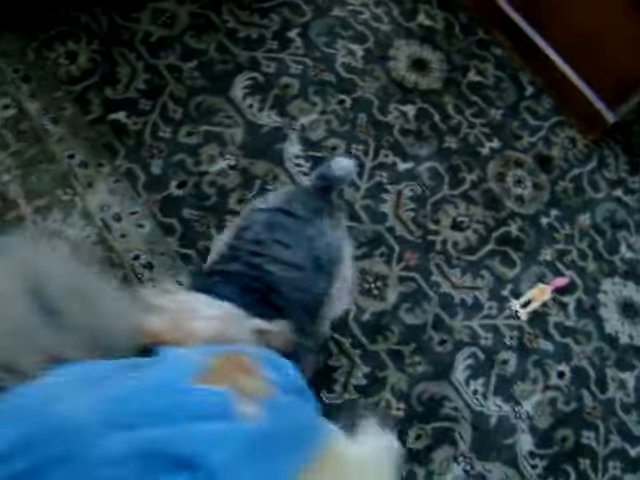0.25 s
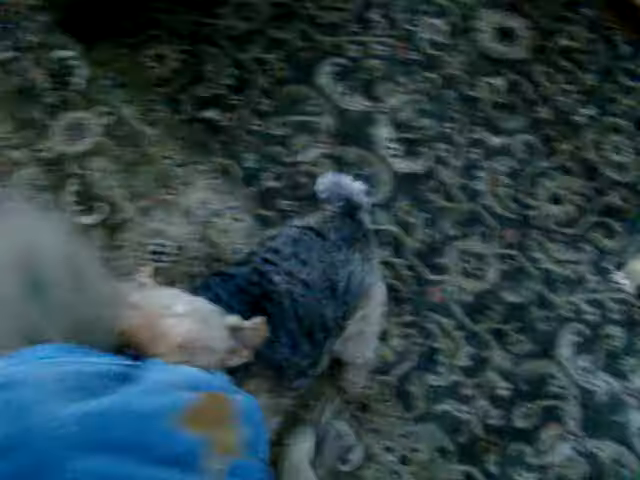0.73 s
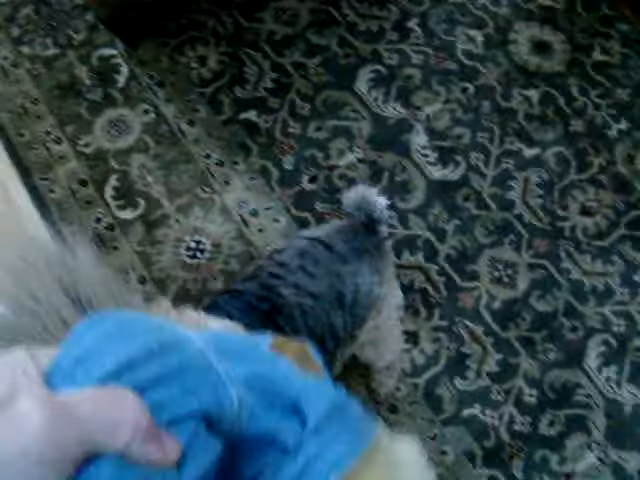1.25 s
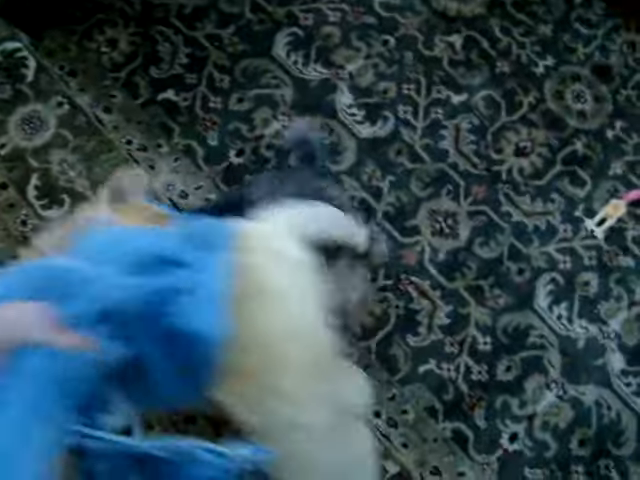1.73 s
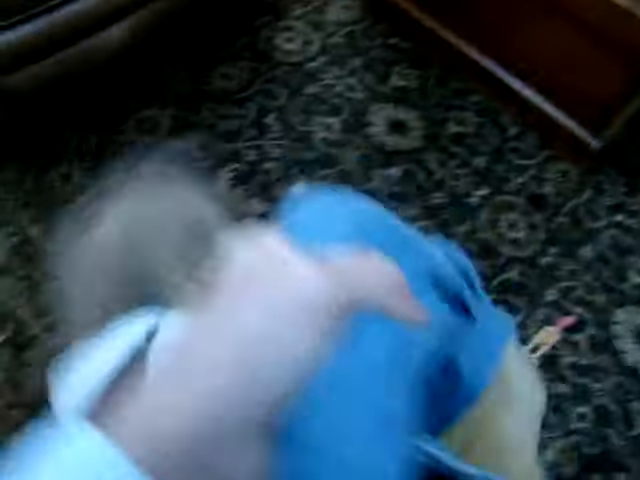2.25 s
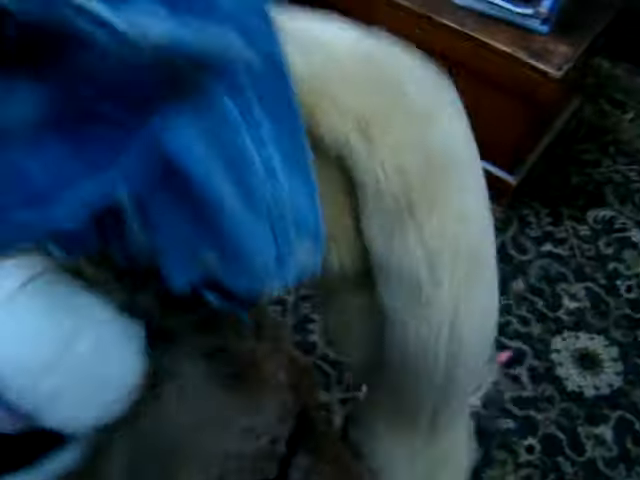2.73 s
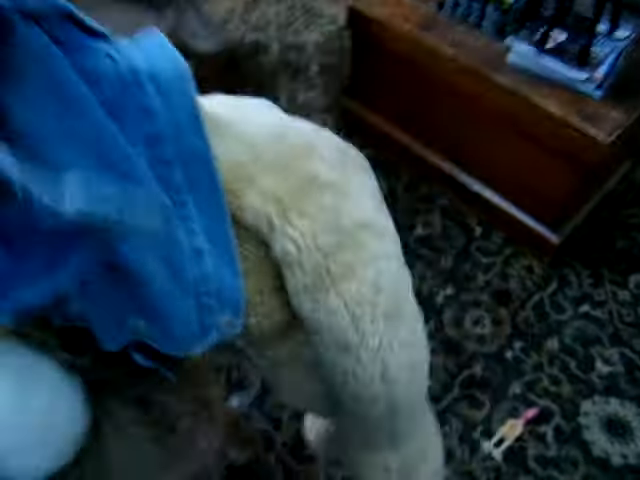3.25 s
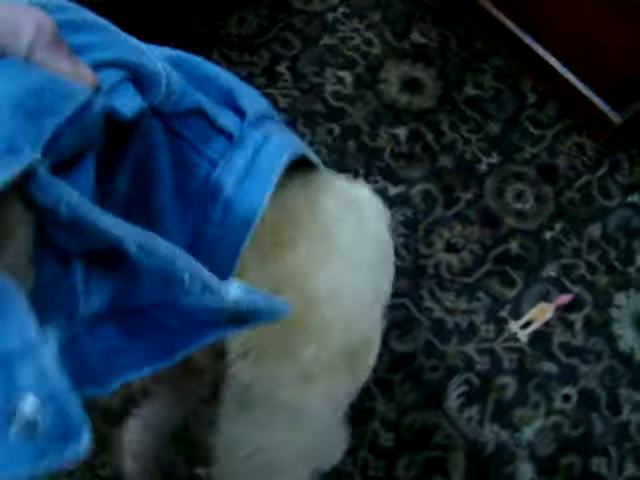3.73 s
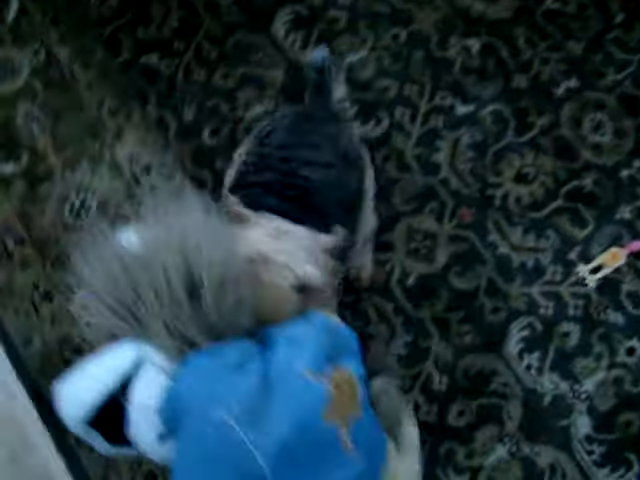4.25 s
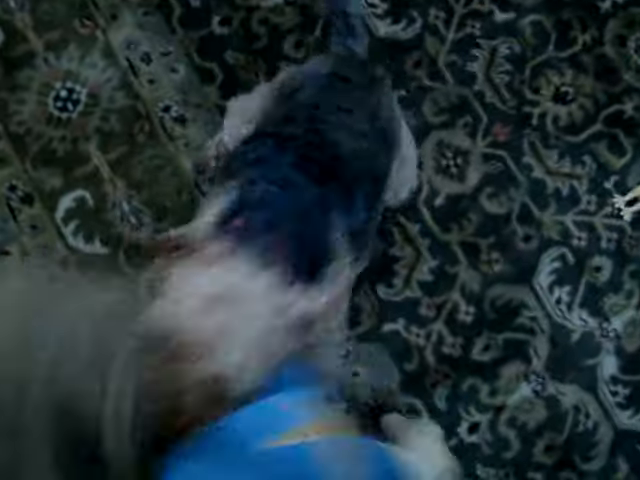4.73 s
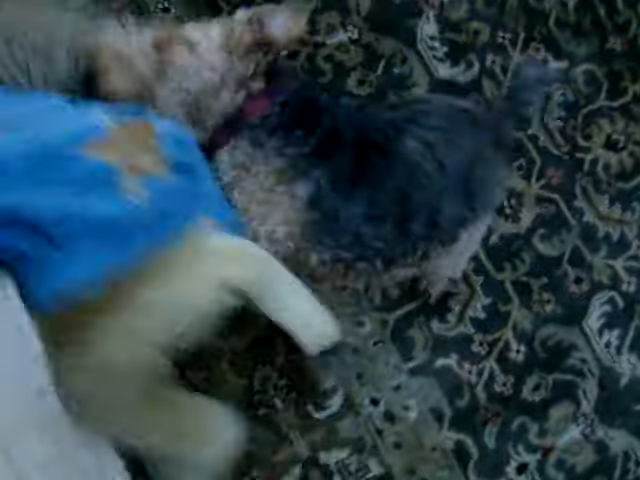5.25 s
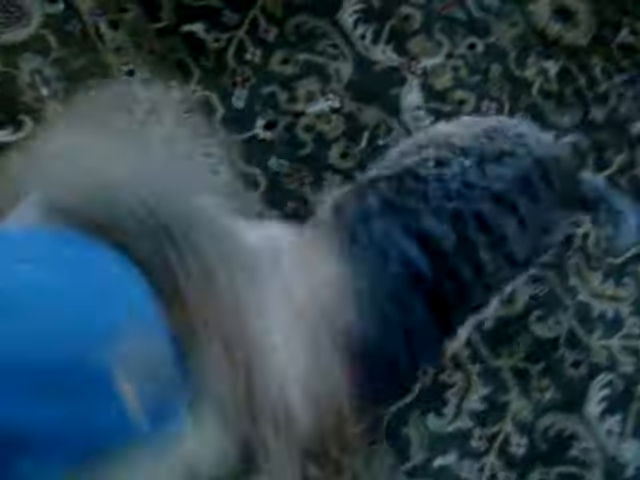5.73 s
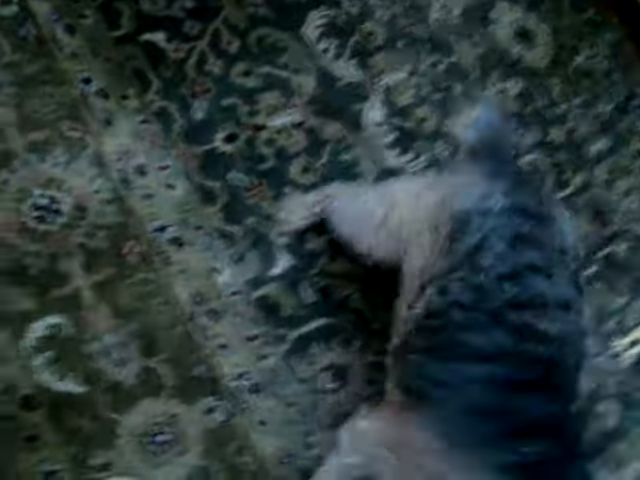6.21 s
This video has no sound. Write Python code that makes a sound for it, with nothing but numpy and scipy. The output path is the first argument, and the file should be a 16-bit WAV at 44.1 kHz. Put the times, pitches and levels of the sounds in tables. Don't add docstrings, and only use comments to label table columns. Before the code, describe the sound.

Close to a small, thin-sounding microphone in a carpeted room, a small dog growls while wrestling a plush toy. A throaty rattle opens, then a long steady growl jumps into a short yelp. A thump and hard rattling snaps follow, then a growl through cloth, a clearer whine, and a rough high snarl ending hoarse. Fabric rustles, scratches and ticks throughout.

```python
import sys
import numpy as np
from scipy import signal
from scipy.io import wavfile
from scipy.ndimage import uniform_filter1d

SR = 44100
rng = np.random.default_rng(int(sys.argv[2]) if len(sys.argv) > 2 else 0)


def digitize_waveform(pressure):
    field = np.atleast_2d(pressure).T
    bounded = np.clip(field, -1, 1)
    quanta = np.round(bounded * 32767).astype(np.int16)
    wavfile.write(sys.argv[1], SR, quanta)


def nominal_scale(level):
    x = np.asarray(level, float) / 20
    return 10 ** x


N = 285768

# time in seconds, effort in dB.
RATTLES = [
    [(0.0, -38), (0.062, -50), (0.096, -42), (0.188, -44), (0.236, -39.5), (0.372, -48.5), (0.502, -76),
     (0.575, -95)],
    [(2.13, -43), (2.18, -31), (2.248, -47), (2.31, -28), (2.372, -38.5), (2.426, -30.5), (2.664, -62.5),
     (2.715, -73)],
    [(3.13, -66), (3.168, -49.5), (3.216, -44), (3.292, -81.5), (3.46, -83)],
    [(3.44, -51.5), (3.49, -48.5), (3.556, -50), (3.6, -54)],
    [(3.56, -61), (3.624, -40.5), (3.722, -69), (3.85, -85)],
    [(4.66, -58), (4.688, -40.5), (4.742, -44), (4.78, -50)],
    [(4.78, -44), (4.82, -34.5), (4.838, -26.5), (4.888, -48.5), (4.95, -40.5), (4.99, -48.5), (5.1, -49),
     (5.222, -49)],
    [(6.09, -36), (6.16, -51), (6.182, -32), (6.26, -38), (6.278, -26.5), (6.48, -54)],
]
# mouth resonance in Hz, chest in dB re mouth, rasp in dB re mouth,
# breath share 0-1.
THROATS = [(910, -6.5, -4.5, 0.83), (782, -4.5, -9, 0.64), (1060, 2.5, 8.5, 1), (770, 2, -10, 0.4),
           (1060, -4, -16.5, 0.95), (1002, -6.5, -5, 0.8), (770, -1, -7.5, 0.54), (800, -4, -11, 0.69)]
# centre in Hz, width in Hz.
CHEST = (290, 120)
# centre in Hz, width in Hz, level in dB.
RASP = [(1065, 413, 16), (1750, 270, 11.5), (2020, 285, 12.5), (2645, 790, 5.5), (3070, 780, 1.5),
        (4260, 1930, -12)]
# start in seconds, peak
# in dB, chest in dB re mouth, ring in Hz.
FLAPS = [(0.101, -28, 1.5, 756), (0.141, -38, 10.5, 786), (0.175, -36.5, 10, 1070),
         (0.209, -35.5, 11, 1070), (0.244, -23, 2.5, 720), (0.279, -41.5, 17.5, 890), (0.316, -27, -8, 910),
         (0.352, -28.5, -8, 790), (1.9985, -20, -21, 614), (2.182, -14, -32, 920), (2.292, -11.5, -27, 780),
         (2.311, -8.5, -41, 843), (2.393, -14.5, -9, 790), (2.412, -24, -15, 740), (2.429, -6.5, -31, 800),
         (2.45, -18, -41, 800), (3.457, -49, 8, 770), (3.491, -26.5, -5, 745), (3.527, -35, 2, 750),
         (4.831, -12.5, -15, 810), (5.001, -23, -8.5, 880), (5.225, -21, -27, 980), (5.457, -23, 0, 951),
         (5.609, -10, -28, 880), (5.875, -17, -21, 800), (6.176, -11.5, -19, 770), (6.214, -12, -21, 910),
         (6.268, -14.5, -5, 740), (6.281, -15, -13, 707)]
# frequency in Hz, density in dB per Hz.
CLOTH = [(2060, -18.5), (3500, 7), (4690, 5), (5960, 6.5), (6590, 10), (8710, 10.5), (9620, 12),
         (10100, 1.5), (10400, -93.5), (13500, -48), (22000, -120)]
# time in seconds, level in dB.
TUGGING = [(0.0, -51), (0.38, -64), (0.819, -55), (1.5, -61.5), (1.804, -55), (2.003, -62), (2.419, -57.5),
           (2.735, -61), (2.745, -44.5), (3.014, -42), (3.261, -59), (3.831, -61.5), (4.1, -51.5),
           (4.631, -51.5), (4.7, -51.5), (5.126, -56.5), (5.612, -45.5), (6.48, -54)]
# peak time in seconds, rise in seconds, fall in seconds,
# level in dB.
SCUFFS = [(1.68, 0.15, 0.07, -53), (1.959, 0.0034, 0.084, -45.5), (2.17, 0.084, 0.0089, -53.5),
          (3.205, 0.062, 0.0099, -30), (4.69, 0.0028, 0.007, -55), (4.86, 0.04, 0.047, -69),
          (5.228, 0.0032, 0.2, -50), (5.41, 0.01, 0.037, -41.5), (5.69, 0.012, 0.0095, -33.5),
          (5.779, 0.017, 0.0062, -45), (6.27, 0.013, 0.044, -51)]
# start in seconds, peak in dB, pitch in Hz.
TICKS = [(0.169, -37, 8650), (1.9558, -35, 8330), (2.024, -38, 8600), (2.106, -43, 8800),
         (2.383, -43, 8040), (2.4988, -41.5, 7900), (2.5228, -68, 7300), (2.541, -42, 8600),
         (2.576, -41.5, 8750), (2.6598, -34.5, 8440), (2.683, -42, 8400), (2.762, -34, 6700),
         (2.833, -27, 8000), (2.888, -36, 8500), (3.1118, -34, 8860), (3.15, -28, 9500),
         (3.263, -31.5, 8460), (3.321, -39, 8750), (3.4086, -50, 8650), (3.4543, -44.5, 8250),
         (3.7132, -41, 8140), (3.7846, -39, 8600), (4.027, -40.5, 8100), (4.686, -34, 8460),
         (5.649, -39, 8470), (5.665, -28, 7434), (5.7027, -35, 7347), (5.7244, -33, 8930),
         (6.003, -42, 8200)]
# time in seconds, fold pitch in Hz, effort in dB, jaws open in dB,
# period doubling in dB.
LONG = [(0.578, 279, -37, -5, 2), (0.605, 291.7, -34.5, 1.5, -18), (0.69, 314.5, -33, 5, -12.5),
        (0.85, 323.6, -36.5, 5.5, -8), (1.088, 298, -35, 4.5, -13.5), (1.31, 282.3, -38, 4.5, -17.5),
        (1.43, 296.5, -38, 4.5, -15.5), (1.6, 306.7, -31, -0.5, -15)]
YELP = [(1.585, 316.7, -20.5, 9, -12), (1.62, 349.7, -30, -0.5, -11), (1.65, 404, -31, 5, -21),
        (1.675, 425.6, -31.5, 9, -28), (1.7, 366.5, -28, 0, -30), (1.73, 298.6, -35, -11, -13),
        (1.76, 289, -30, 17, -20)]
GRUMBLE = [(1.745, 304, -41, 9, -22), (1.8, 287, -36, -6, -21), (1.835, 321.6, -32, 0, -20),
           (1.875, 325, -33, 5.5, -12.5), (1.92, 273.7, -33.5, 0, -23), (1.96, 253, -38, -2, -31),
           (1.995, 311.7, -17, -9.5, -48), (2.04, 291.3, -38.5, 7.5, -18), (2.13, 266.3, -48, 1, -28)]
BITE = [(2.715, 291, -29, 19, 4), (2.729, 289.1, -33, 6, -13), (2.781, 349.5, -36.5, 12, 1.5),
        (2.899, 322.2, -31.5, 2.5, -5.5), (3.007, 349.6, -30.5, -4, -7), (3.08, 314, -35.5, -3, -1.5),
        (3.12, 307, -33.5, -6, -16), (3.15, 308.6, -47, -8, -10)]
WHINE = [(3.852, 295, -47, -9, -2), (3.875, 310.9, -35, 0.5, -21.5), (3.981, 311, -30, -1.5, -20),
         (4.085, 318.5, -26.5, -7, -24.5), (4.16, 364, -24, -3.5, -52), (4.25, 409, -29.5, -3.5, -46),
         (4.36, 346, -28, -3.5, -53), (4.535, 276.5, -35.5, -2, -41), (4.63, 263, -42.5, 0, -32)]
WINDUP = [(5.216, 325, -41, 10, 14), (5.25, 309, -35.5, 10.5, -25), (5.304, 308.7, -40.5, -13, -27),
          (5.395, 384.3, -34, 2, -37), (5.42, 336, -34.5, 7, -41), (5.455, 291, -17, -2, -27)]
SNARL = [(5.445, 437.7, -12, 9.5, -15), (5.465, 452.6, -25.5, 1, -33), (5.52, 475.5, -32.5, 1.19, -13.5),
         (5.565, 460.8, -30.5, 2.4, -29), (5.61, 447, -27.5, 2.1, -32), (5.68, 414.4, -39, 4, -20),
         (5.735, 423, -31, 2.6, -30), (5.76, 405.6, -32.5, 2.9, -39), (5.8, 334, -41, 2.9, -26)]
HOARSE = [(5.79, 372, -27, 9.3, -19), (5.834, 311.8, -30.5, 1.4, -32), (5.852, 331.7, -37, 16, -8),
          (5.956, 336.3, -37, 7, -30), (6.072, 313.6, -44.5, 8.8, -14), (6.1, 356, -37, 5, -5)]
# curve, mouth resonance in Hz, octave line in dB, rasp in dB re mouth,
# rasp drift in dB per second.
BOUTS = [
    (LONG, 884, 1.5, -7, -7),
    (YELP, 1030, -1.4, -5, 8.7),
    (GRUMBLE, 870, 1.2, -14.5, 26),
    (BITE, 860, 0.66, 1, -55),
    (WHINE, 914, 2.7, -24.5, 1.7),
    (WINDUP, 923, 1.1, -15, 64),
    (SNARL, 765, 0.71, -1.1, 4.8),
    (HOARSE, 780, -1.4, -9.5, 0),
]
VOICING = [(.33, .32), (.44, .25), (.36, .28), (.33, .2), (.34, .38), (.4, .35), (.43, .42), (.8, .4)]
# time of one throb in seconds, throbs per second, drift per second squared.
THROBS = [(.6065, 27.75, -4.5), (1.591, 27, 12), (1.752, 26, 12), (2.738, 29.5, -12), (3.878, 26, 0),
          (5.227, 20, 3), (5.465, 28.25, 4.5), (5.785, 24.5, -12)]
# mouth width in Hz, pulse share in the rasp, overtone lines in dB re effort.
JAWS = [(200, 0.34, -35), (230, .36, -6), (240, 0.36, -9), (430, 0.59, -27), (200, .3, -42),
        (230, .36, -21), (230, 1, -16.5), (242, 0.81, -7)]
# muffled above Hz, fifth half line in dB re half line,
# third line in dB re effort.
GAGS = [(1220, 9.5, -8.5), (1250, -9, -12), (1200, -12, -21), (1290, -15.5, -16.5), (1120, -10, -21),
        (1180, -5, -28), (1300, -8, -11.5), (1190, -10, -24)]
# multiple of the pitch, level in dB.
OVERTONES = [(4, -10), (5, -13)]
# start in seconds, peak in dB, ring in Hz, rasp in dB re
SNAPS = [(0.596, -24, 940, -47), (0.776, -13, 955, -29), (0.812, -11, 844, -34), (0.893, -17, 800, -27),
         (1.201, -19, 870, -28.5), (4.17, -32, 710, -27), (4.808, -31, 840, -9.5),
         (4.892, -25.5, 830, -16.5), (4.936, -36, 859, -6), (5.04, -31, 940, -29), (5.101, -26.5, 690, -40),
         (5.122, -27.5, 874, -39), (5.236, -18.5, 1063, -19.5), (5.466, -4, 925, -37),
         (5.496, -29, 965, -29), (5.511, -10, 1050, -40), (5.561, -9, 930, -28), (5.597, -18, 840, -27),
         (5.629, -6, 909, -38), (5.728, -10, 844, -27), (5.751, -35, 770, -5), (5.794, -12.5, 856, -31.5),
         (5.814, -28, 836, -35), (5.853, -15, 770, -36), (5.894, -8.5, 880, -33), (6.031, -23, 770, -25),
         (6.064, -24, 800, -24), (6.139, -23, 1110, -18), (6.234, -30, 851, -33), (6.291, -12.5, 781, -31),
         (6.301, -22, 776, -29), (6.313, -15, 770, -31), (6.423, -29, 680, -18), (6.447, -22, 710, -24)]
# start in seconds, peak in dB, centre in Hz, decay in seconds.
SCRATCHES = [(1.8785, -41, 4900, 0.0038), (1.9245, -36, 4500, 0.0026), (1.954, -35, 3400, 0.0071),
             (1.9972, -31.5, 2580, 0.0081), (2.0463, -33, 2900, 0.0074), (2.0838, -37, 2830, 0.018),
             (2.139, -32.5, 3977, 0.0029), (2.1625, -34, 4850, 0.0031), (2.589, -49, 3200, .003),
             (4.681, -33.5, 3730, 0.0062), (5.0223, -43, 2660, 0.0035), (5.1783, -46, 3530, 0.0036),
             (5.2245, -29.5, 3370, 0.004), (5.4052, -34, 3520, 0.03), (5.768, -24, 3260, 0.0061),
             (5.9085, -36, 3970, 0.0061), (6.017, -34, 3600, 0.0018), (6.0444, -31.5, 4850, 0.0036),
             (6.176, -36.5, 3400, 0.003), (6.2398, -39.5, 3000, 0.0056), (6.268, -35, 4000, 0.0032),
             (6.4348, -44, 4430, 0.0088)]
# start in seconds, peak in dB, pitch in Hz.
THUMPS = [
    (1.998, -7, 335),
    (5.701, -21, 200),
    (6.097, -41, 200),
]
# peak time in seconds, half length in
# seconds, pitch in Hz, level in dB, # width as share of pitch.
WHISTLES = [(2.975, .04, 1230, -37, .08), (3.64, .06, 3300, -59, .025), (4.3, .17, 2350, -54, .1),
            (2.79, .045, 2150, -38, .3), (6.135, .03, 2400, -48, .1), (2.07, .035, 2850, -44, .12),
            (5.72, .05, 2150, -40, .15), (3.21, .025, 1800, -41, .3), (6.31, .045, 2700, -47, .2),
            (5.87, .05, 1450, -39, .25), (6.44, .03, 200, -44, .3), (5.5, .03, 620, -33, .12)]
# start in seconds, peak in dB, top modes in dB.
CLACKS = [
    (2.386, -34, -11),
    (2.946, -44, 6),
    (3.8606, -32, 0.5),
    (4.2062, -28, -5),
    (4.2354, -53.5, 8.5),
    (4.6811, -40, -4),
]
# frequency in Hz, level in dB, T60 in seconds.
TAG = [(1640, -3, .016), (2250, -6, .008), (2900, -6, .007), (3700, -6, .006), (4720, -3, .011),
       (5300, -6, .006)]
# frequency in Hz, density in dB per Hz.
HUSH = [(15, -30), (25, -13), (320, 10), (1610, 0.5), (3890, -8), (5130, -9), (6280, -11), (7490, -57),
        (8500, -12), (9170, -29), (10400, -49.5), (13500, -81), (22000, -120)]
# low edge in Hz, high edge in Hz, share of moments.
DROPOUTS = [(3400, 4700, .008), (4700, 5200, .1), (5200, 5800, .09), (5800, 6400, .08), (6400, 7000, .09),
            (7000, 7700, .1), (7700, 8400, .11), (8400, 9200, .12), (9200, 9800, .14), (9800, 11000, .2)]


def evened(x):
    return x / np.sqrt(np.mean(x ** 2) + 1e-20)


def smoothed(x, size, axis=-1):
    return uniform_filter1d(uniform_filter1d(x, size, axis), size, axis)


def steady(x):
    return x / np.sqrt(smoothed(x ** 2, 2600) + 1e-9)


def add(mix, start_s, sound):
    part = mix[max(round(start_s * SR), 0):][:len(sound)]
    part += sound[:len(part)]


def unroll(rows):
    s, *columns = np.transpose(rows)
    t = np.arange(s[0], s[-1], 1 / SR)
    return t, *(np.interp(t, s, c) for c in columns)


def resonate(x, hz, width_hz):
    turn = np.exp(2j * np.pi * np.cumsum(hz * np.ones(len(x))) / SR)
    r = np.exp(-np.pi * width_hz / SR)
    return 2 * (turn * signal.lfilter([1 - r], [1, -r], x / turn + 1e-18)).real


def wander(count, hz):
    size = max(int(SR / hz / 2), 1)
    return evened(smoothed(rng.standard_normal(count), size))


def hiss(points, patchy_db):
    hz = np.fft.rfftfreq(512, 1 / SR)
    f, db = np.transpose(points)
    a, b, patches = rng.standard_normal((N // 128 + 5, 257, 3)).T
    patches = uniform_filter1d(uniform_filter1d(patches, 8, 0), 10, 1)
    level_db = np.interp(np.log(hz + 1), np.log(f + 1), db)[:, None] + patchy_db * evened(patches)
    z = (a + 1j * b) * nominal_scale(level_db)
    return evened(signal.istft(z, nperseg=512, noverlap=384)[1][:N])


def ring(hz, t60_s):
    t = np.arange(int(t60_s * SR)) / SR
    start = np.minimum(t * max(hz, 1500), 1)
    return start * nominal_scale(-60 * t / t60_s) * np.sin(2 * np.pi * hz * t)


def rasp(drive, tilt_db):
    out = 0
    for k, (hz, width_hz, db) in enumerate(RASP):
        band = resonate(resonate(drive, hz, 2 * width_hz), hz, width_hz)
        out = out + (-1) ** k * nominal_scale(db + k * tilt_db) * band
    return out


def rattle(rows, mouth_hz, chest_db, rasp_db, breath):
    t, mouth_db = unroll(rows)
    n = len(t)
    rasp_db = rasp_db - 0.4887 * (mouth_db + 39.5)
    flap_hz = np.clip(48 * nominal_scale(2.6 * wander(n, 40)), 5, 300)
    turns = np.cumsum(flap_hz) / SR
    flaps = np.diff(np.floor(turns), prepend=0) * nominal_scale(2.5 * rng.standard_normal(n))
    puffs = (0.3 + np.exp(-(turns % 1) / 0.45)) * rng.standard_normal(n)
    drive = (1 - breath) * evened(flaps) + breath * evened(puffs)
    chest = resonate(resonate(drive, CHEST[0], 300), *CHEST)
    mouth = resonate(resonate(drive, mouth_hz, 440), mouth_hz, 370)
    upper = rasp(0.048 * evened(flaps) + evened(puffs), tilt_db=5.0)
    ribs = resonate(chest + 0.3 * drive, 126, 83)
    parts = steady(evened(mouth)) + nominal_scale(chest_db) * steady(evened(chest))
    parts += nominal_scale(rasp_db) * steady(evened(upper)) + nominal_scale(chest_db - 8) * evened(ribs)
    return t[0], nominal_scale(mouth_db) * parts * signal.windows.tukey(n, 0.0026 / (t[-1] - t[0]))


def rattles():
    out = np.zeros(N)
    for rows, throat in zip(RATTLES, THROATS):
        add(out, *rattle(rows, *throat))
    return out


def cloth():
    t = np.arange(N) / SR
    s, db = np.transpose(TUGGING)
    level = nominal_scale(np.interp(t, s, db))
    for s, rise_s, fall_s, db in SCUFFS:
        level = level + nominal_scale(db) * np.exp(-((t - s) / np.where(t < s, rise_s, fall_s)) ** 2)
    crackle = nominal_scale(2.0 * wander(N, 160))
    return level * evened(hiss(CLOTH, patchy_db=2.2) * crackle)


def flaps():
    out = np.zeros(N)
    for s, db, chest_db, hz in FLAPS:
        add(out, s, nominal_scale(db) * ring(hz, 0.026))
        add(out, s, nominal_scale(db + chest_db) * ring(CHEST[0], 0.045))
    return out


def ticks():
    out = np.zeros(N)
    for s, db, hz in TICKS:
        tick = ring(hz, 0.008) + 0.6 * ring(hz * rng.uniform(0.88, 1.1), 0.008)
        add(out, s, nominal_scale(db + 6.5) * tick)
    return out


def blurred(turns, hz, rough, width_hz):
    blur = np.clip(1.6 * (rough - 0.3), 0, 1)
    band = resonate(resonate(rng.standard_normal(len(hz)), hz, 2 * width_hz), hz, width_hz)
    return np.sqrt(2 - 2 * blur) * np.sin(2 * np.pi * turns) + np.sqrt(blur) * evened(band)


def growl(rows, mouth_hz, octave_db, rasp_db, drift_db, rough, depth, throb_s, throb_rate, throb_drift,
          width_hz, pulsed, overtone_db, muffle_hz, fifth_db, third_db):
    t, hz, line_db, open_db, doubling_db = unroll(rows)
    n = len(t)
    mouth_db = line_db + open_db
    half_db = line_db + doubling_db
    octave_db = mouth_db + octave_db - 10 * np.log10(1 + ((2 * hz - 819) / 70.3) ** 4)
    rasp_db = rasp_db - 1.12 * (mouth_db + 31.5) + drift_db * (t - t[0])
    mouth_hz = mouth_hz * (hz / hz.mean()) ** 0.19

    since_s = t - throb_s
    throb = np.pi * (2 * throb_rate + throb_drift * since_s) * since_s + 0.25 * wander(n, 8)
    flutter = 1 + depth * np.cos(throb)
    hz = hz * (1 - 0.5 * depth ** 2 * np.sin(throb))

    turns = np.cumsum(hz * (1 + 0.057 * rough * wander(n, 120))) / SR
    unequal = np.clip(nominal_scale(half_db - line_db + 13.5), 0, 1)
    shimmer = nominal_scale(4 * rough * rng.standard_normal(n)[turns.astype(int)])
    size = np.where(turns % 2 < 1, 1, 1 - unequal) * shimmer
    folds = np.diff(np.floor(turns), prepend=0) * size
    puffs = (0.35 + size * np.exp(-(turns % 1) / 0.5)) * rng.standard_normal(n)
    drive = (1 - rough) * evened(folds - folds.mean()) + rough * evened(puffs)

    mouth = resonate(resonate(drive, mouth_hz, 2.6 * width_hz), mouth_hz, width_hz)
    mouth = mouth + 0.85 * resonate(resonate(puffs, 0.984 * mouth_hz, 260), mouth_hz, 300)
    muffle = signal.butter(6, muffle_hz, fs=SR, output="sos")
    mouth = signal.sosfilt(muffle, mouth) * flutter ** 0.29
    valley = signal.butter(3, 560, "high", fs=SR, output="sos")
    mouth = signal.sosfilt(valley, mouth)

    def line(multiple, roughness, width_hz, phase=0):
        return blurred(multiple * turns + phase, multiple * hz, roughness, width_hz)

    lines = nominal_scale(line_db) * flutter * line(1, rough + 0.044, 86)
    lines += nominal_scale(half_db + 4) * line(0.5, rough - 0.04, 32)
    lines += nominal_scale(octave_db + 3.5) * flutter * line(2, rough + 0.046, 130, phase=0.21)
    lines += nominal_scale(half_db - 6) * line(1.5, rough, 60)
    for multiple, db in OVERTONES:
        lines += flutter * nominal_scale(line_db + overtone_db + db) * line(multiple, rough + 0.057, 35 * multiple)
    lines += nominal_scale(half_db + fifth_db) * flutter * line(2.5, rough, 70)
    lines += nominal_scale(line_db + third_db) * flutter * line(3, rough + 0.03, 90)

    upper = rasp(pulsed * evened(folds) + evened(puffs), tilt_db=0.27 * open_db) * np.sqrt(flutter)
    throat = 0.65 * steady(evened(mouth)) + nominal_scale(rasp_db) * steady(evened(upper))
    voice = lines + nominal_scale(mouth_db) * throat
    return t[0], voice * signal.windows.tukey(n, 0.056 / (t[-1] - t[0]))


def growls():
    out = np.zeros(N)
    for bout, voicing, throb, jaws, gag in zip(BOUTS, VOICING, THROBS, JAWS, GAGS):
        add(out, *growl(*bout, *voicing, *throb, *jaws, *gag))
    return out


def snaps():
    out, spit = np.zeros(N), np.zeros(N)
    t = np.arange(1500) / SR
    puff = np.minimum(t / 0.0021, 1) * np.exp(-t / 0.0095)
    for s, db, hz, rasp_db in SNAPS:
        add(out, s, nominal_scale(db - 3.5) * ring(hz, 0.033))
        add(spit, s, nominal_scale(db + rasp_db + 5) * puff)
    band = signal.butter(4, [1500, 4400], "band", fs=SR, output="sos")
    air = signal.sosfilt(band, rng.standard_normal(N))
    return out + spit * evened(air)


def scratches():
    out, t = np.zeros(N), np.arange(3000) / SR
    for s, db, hz, decay_s in SCRATCHES:
        noise = resonate(resonate(rng.standard_normal(len(t)), hz, 2100), hz, 1700)
        add(out, s, nominal_scale(db) * np.minimum(t / 0.00037, 1) * np.exp(-t / decay_s) * evened(noise))
    return out


def thumps():
    out = np.zeros(N)
    for s, db, hz in THUMPS:
        u = np.arange(2000) / SR * hz
        add(out, s, nominal_scale(db - 5) * u * (2 - 0.88 * u) * np.exp(-2.2 * u))
        add(out, s, nominal_scale(db - 5) * ring(1800, 0.003))
    return out


def nose():
    out = np.zeros(N)
    t = np.arange(-0.3, 0.3, 1 / SR)
    for s, half_s, hz, db, share in WHISTLES:
        width_hz = share * hz
        air = resonate(resonate(rng.standard_normal(len(t)), hz, 1.6 * width_hz), hz, width_hz)
        add(out, s + t[0], nominal_scale(db) * np.exp(-(t / half_s) ** 2) * evened(air))
    return out


def tag():
    out = np.zeros(N)
    for s, db, top_db in CLACKS:
        for hz, mode_db, t60_s in TAG:
            tilt_db = (top_db + 0.5) * (hz > 3500)
            add(out, s, nominal_scale(db + 12.5 + mode_db + tilt_db) * ring(hz, t60_s))
    return out


def room(x):
    taps = np.zeros(SR // 3)
    at = np.arange(150, len(taps) - 20, 20)
    taps[at + rng.integers(0, 20, len(at))] = rng.choice([-1., 1.], len(at))
    fade = nominal_scale(-60 * np.arange(len(taps)) / SR / 0.23)
    taps = signal.lfilter([1], [1, -0.5], taps * fade)
    return signal.fftconvolve(x, taps / np.linalg.norm(taps))[:N]


def scene():
    dog = rattles() + flaps() + growls() + snaps() + nose()
    toy = cloth() + ticks() + scratches() + thumps()
    near = dog + toy
    return (near + tag() + nominal_scale(-10.5) * room(near))[None]


def dropouts(x):
    hz, t, z = signal.stft(x, SR, nperseg=256, noverlap=128)
    block = np.arange(len(t)) // 3
    draws = rng.random((block[-1] + 1, len(DROPOUTS) + 1))
    mood = nominal_scale(7 * wander(len(draws), 5000))
    gap_s = np.abs(t[1::3, None] - np.array(TICKS)[:, 0] - 0.003).min(1)
    gap_s = np.resize(gap_s, len(draws))
    beside = (gap_s > 0.008) * (gap_s < 0.03) * (draws[:, -1] < 0.7)
    beside = beside * (np.abs(t[::3] - 2.99) > 0.25) * (np.abs(t[::3] - 1.995) > 0.04)
    keep = np.ones(z.shape[1:])
    for k, (low_hz, high_hz, share) in enumerate(DROPOUTS):
        chance = share * (mood * 0.6 + 0.5) + beside * (0.9 if low_hz > 6500 else 0.25)
        drop = draws[:, k] < chance
        keep[(hz >= low_hz) & (hz < high_hz)] = 1 - drop[block]
    return signal.istft(z * keep, SR, nperseg=256, noverlap=128)[1][:, :N]


def low_pass(x):
    return signal.sosfilt(signal.butter(12, 11300, fs=SR, output="sos"), x)


def record(dry):
    thin = signal.sosfilt(signal.butter(3, 110, "high", fs=SR, output="sos"), dry)
    thin = thin + nominal_scale(-52.5) * hiss(HUSH, patchy_db=1.5)
    edge = signal.firwin(511, 10300, window=("kaiser", 9), fs=SR)
    limited = signal.oaconvolve(dropouts(thin), edge[None], "same")
    return low_pass(limited)


dry = scene()
out = record(dry)
digitize_waveform(out)
```